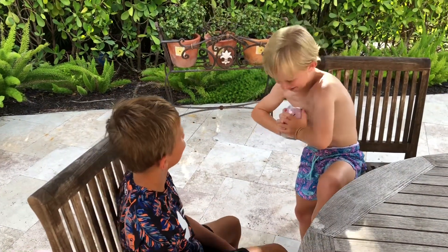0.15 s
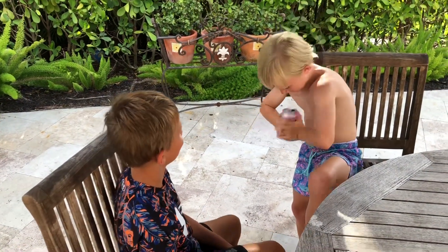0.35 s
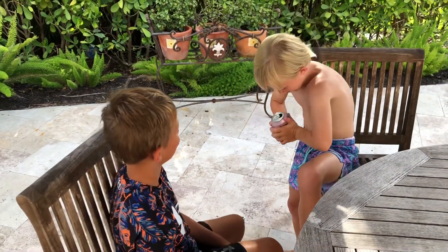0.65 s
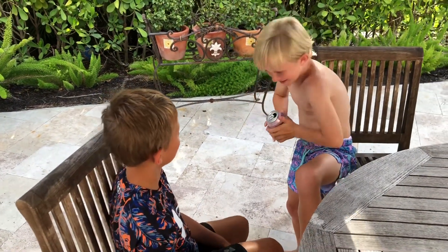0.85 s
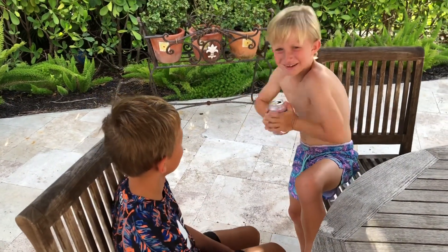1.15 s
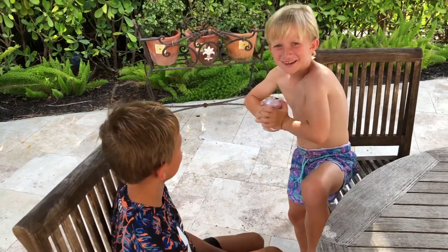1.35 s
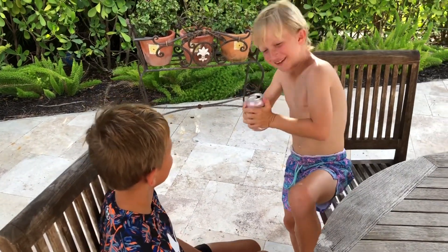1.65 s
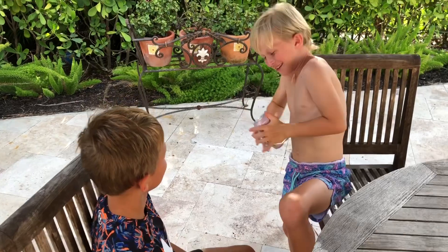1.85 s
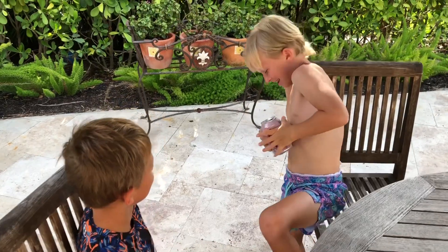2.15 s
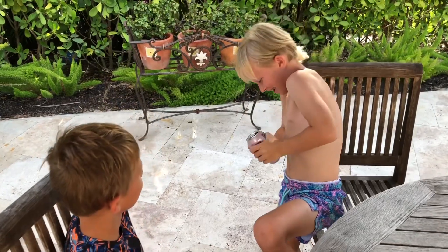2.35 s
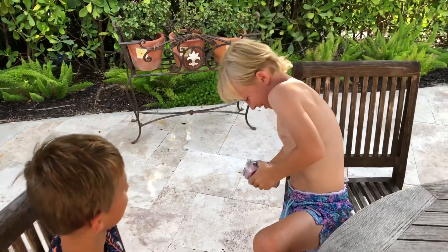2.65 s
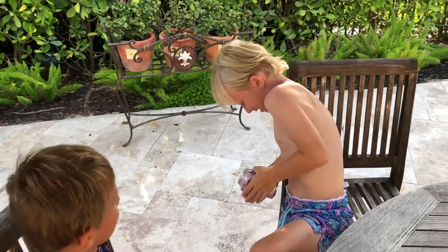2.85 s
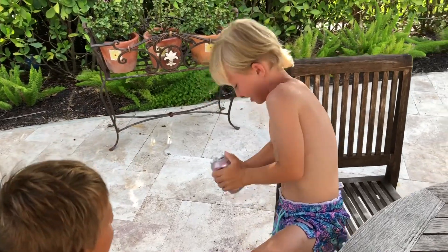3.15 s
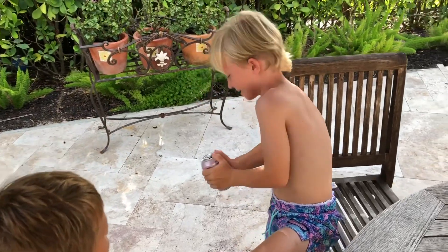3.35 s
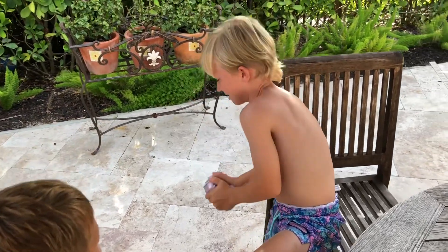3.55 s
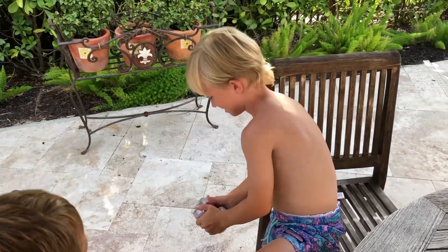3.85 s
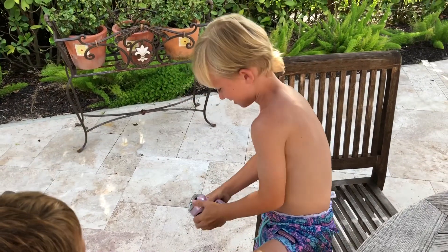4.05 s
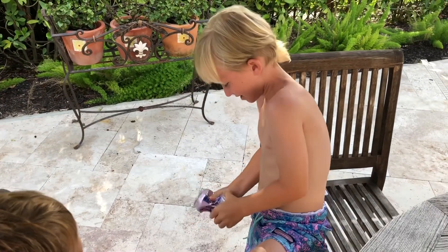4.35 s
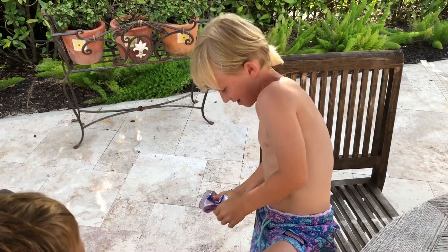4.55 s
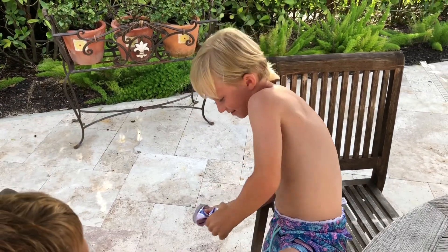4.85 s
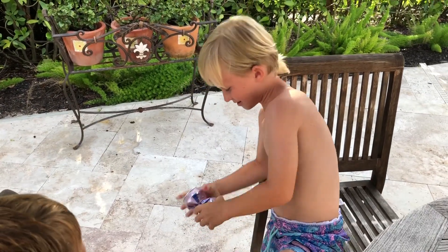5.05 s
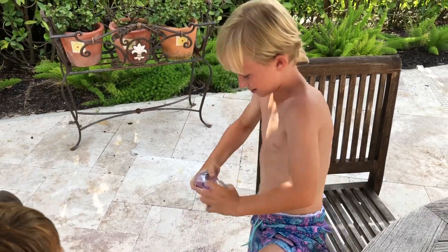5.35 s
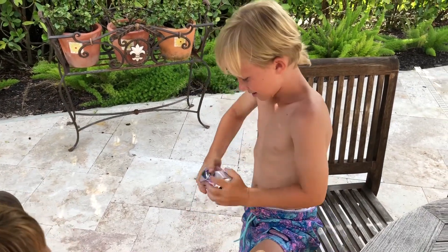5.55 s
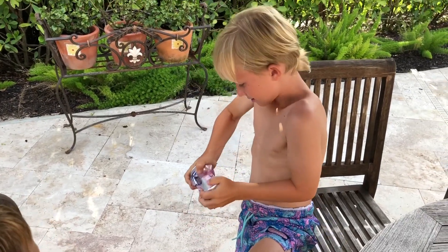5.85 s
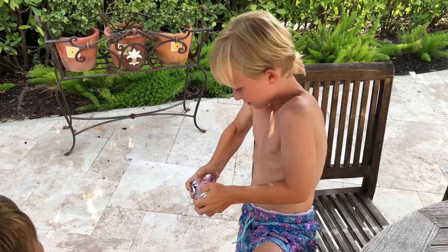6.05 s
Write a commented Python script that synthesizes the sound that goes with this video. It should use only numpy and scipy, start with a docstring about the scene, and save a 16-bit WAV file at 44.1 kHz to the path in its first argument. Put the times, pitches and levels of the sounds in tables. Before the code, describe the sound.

Hands squeeze an empty drink can on a patio, making bursts of tinny snaps and crackles that thin out toward the end.

```python
"""Garden patio: a thin aluminium can is crumpled by hand, a metre or two from a phone.
Each buckle snaps a wall facet through; a click and a brief crease chatter ring the facet and the air
in the can. Fingers rustle on the metal. Paving, house wall and hedge echo briefly. Behind: soft bumps
of the hand on the phone, a thin bird whistle, low outdoor rumble, leaf hiss and a distant motor's hum."""
import sys
import numpy as np
from scipy import signal
from scipy.fft import rfft, irfft
from scipy.io import wavfile
from scipy.ndimage import uniform_filter1d

SR = 44100
rng = np.random.default_rng(int(sys.argv[2]) if len(sys.argv) > 2 else 0)


def generate_wav(signal):
    """Clip the signal to [-1, 1] and save it as 16-bit WAV at the path in sys.argv[1]."""
    frames = np.transpose(np.atleast_2d(signal))
    scaled = np.clip(frames, -1, 1) * 32767
    pcm = np.round(scaled).astype(np.int16)
    wavfile.write(sys.argv[1], SR, pcm)


N = 273759

# Wall buckles. Each row: start in seconds, level in dB over 10 ms, facet pitch in Hz, crease pitch in Hz,
# then crease, crackle and can air in dB re the facet, and patio echo in dB re the direct sound.
BUCKLES = [(-0.03, -14.5, 5800, 8800, -3.5, -17, -10, -12.5),
           (0.066, -30.5, 3090, 6200, -2, -9.5, -5, -17.5),
           (0.082, -22.5, 3200, 9000, -9, -9.5, -14, -15.5),
           (0.1407, -15.5, 4060, 9400, -22, -10, -7.5, -12), (0.356, -41, 1040, 7900, -23, -16, -0.5, -4),
           (0.3663, -22, 8760, 11500, -4.5, -13.5, -10, -10.5), (0.406, -40.5, 1030, 3800, -5, -21, 7, -8),
           (0.4371, -41.5, 1230, 9000, -24, -20, -11, -11), (0.5426, -48, 1490, 4800, -20, -18, -5, -17),
           (0.8249, -21, 1520, 7900, 2.5, -8.5, -2, -14), (0.8681, -31, 5650, 7900, -3, -10.5, -3, -17),
           (0.914, -28.5, 1650, 6500, -15, -9.5, 1, -14), (1.0515, -45.5, 1010, 3180, -8, -1, 6, -11),
           (1.086, -27, 1150, 6600, -2, -4.5, -3, -15.5), (1.1831, -38, 1720, 2550, -23, -10, -23.5, -12),
           (1.3084, -39.5, 1120, 5700, 2.5, -16, 7, -13.5), (1.332, -37, 5730, 9100, -2.5, -8, -17.5, -12),
           (1.378, -27, 5600, 9500, 2, -14, -1.5, -17.5), (1.4247, -20, 7280, 9100, -1.5, -7.5, 3, -15.5),
           (1.5429, -24.5, 1360, 10200, -3, -5.5, 1, -12),
           (1.763, -12.5, 2470, 8150, -3, -5.5, -9.5, -14.5), (1.7947, -30.5, 1680, 4100, 11, 0, 0, -17),
           (1.9268, -37.5, 1210, 3100, -24.5, -22, -13, -8.5),
           (1.9388, -23, 1200, 7700, -15.5, -11, -13, -15.5),
           (2.0082, -28.5, 2100, 3780, -26, -21, -23.5, -18), (2.069, -24, 3130, 7700, -5, -9, -8, -17),
           (2.0892, -22.5, 3900, 10200, 2, -5.5, -3.5, -13), (2.1035, -18, 1197, 9300, -12.5, -14, 0, -13),
           (2.1199, -17, 1230, 7800, -6.5, -12.5, -8, -17), (2.1508, -25, 1150, 5800, -1, 5, 5, -7),
           (2.1616, -25, 1700, 10040, -15.5, -15.5, -23.5, -18),
           (2.1846, -21.5, 1090, 8680, -7, -12, -10.5, -15),
           (2.2421, -14.5, 2150, 8340, -8, -11.5, -6.5, -8),
           (2.2577, -22.5, 1090, 4800, -12, -19, -0.5, -6), (2.402, -31.5, 1960, 8460, 1, -8, -3.5, -16),
           (2.458, -34, 1220, 3830, -3, -5.5, -19, -19), (2.4613, -12, 1190, 8500, -17, -15, -11, -12),
           (2.4775, -15, 880, 9740, -9.5, -17, -4, -14.5), (2.5722, -35, 3880, 4900, 1.5, -9, 0, -13),
           (2.9499, -41.5, 1040, 7000, -20, -16.5, 15.5, -18),
           (3.2292, -22.5, 1590, 8300, -3.5, -8.5, -2, -18),
           (3.2669, -20, 7260, 10000, -3, -18.5, -30.5, -15.5),
           (3.2774, -27, 985, 8000, -7, -7, -1.5, -12.5), (3.3295, -19, 836, 1940, -2.5, -15, 3.5, -13),
           (3.3704, -29, 1120, 9000, -15, -18, 0, -13), (3.3789, -23.5, 1700, 8300, -22, -3, 6, -17),
           (3.4231, -34.5, 8100, 10500, -2, -12, -6, -18), (3.502, -29, 3950, 8600, -1.5, -7, 0.5, -15.5),
           (3.5812, -44, 3910, 5000, -23, -10, -11, -15),
           (3.6345, -38, 1000, 6940, -27, -14.5, 16.5, -10.5),
           (3.8521, -42.5, 1600, 3960, -4, -3.5, 15.5, -15),
           (4.2878, -38.5, 1560, 2010, -32, -38, -10, -24),
           (4.3073, -14.5, 3473, 8800, -10, -22, -26, -18.5),
           (4.416, -41.5, 950, 2760, -17, -9.5, 8.5, -21), (4.5834, -47, 1944, 3400, -15, -16, 2, -25),
           (5.59, -57, 4010, 13400, 3, 10, -5, -11), (5.8392, -40, 1136, 4150, -19, -14, 2.5, -17),
           (6.1128, -21.5, 3450, 6300, -10.5, -23.5, -24, -17)]
# Overtones of a large facet. Each row: multiple of the facet pitch, level in dB re the bending mode.
FACET_OVERTONES = [(1.38, -9), (1.85, -8.5)]
# Lasting rings of the whole can. Each row: centre in Hz, width in Hz, level in dB re the flat response.
HOLLOW_RINGS = [(469.5, 35, 3), (952, 72, -1.5), (1120, 45, -0.5), (1605, 120, 2.5), (2320, 41, -1),
                (3380, 23, -2)]
# Finger slides. Each row: start in seconds, length in seconds, rms level in dB, centre in Hz.
FINGER_SLIDES = [(4.011, 0.2, -59, 3180), (4.973, 0.09, -59.5, 6700)]
# House and hedge tail. Each row: low and high edge in Hz, level in dB re early echoes, T60 in seconds.
TAIL_BANDS = [(686, 2400, -11.5, .65), (2400, 6600, -11, 0.63), (6000, 9400, -21, .57)]
# Hand bumps on the phone. Each row: time in seconds, peak in dB.
HAND_BUMPS = [(1.776, -30.5), (2.038, -33.5), (2.79, -31.5), (4.828, -33), (5.239, -41), (5.409, -41),
              (5.959, -31), (6.128, -32.5)]
# Bird whistles. Each row: start in seconds, length in seconds, start and end pitch in Hz, rms level in dB.
BIRD_WHISTLES = [(0.575, 0.47, 6100, 6020, -66), (1.146, .22, 5960, 5920, -65),
                 (5.205, 0.21, 5790, 5770, -70.5), (5.314, 0.162, 6370, 6400, -70),
                 (6.056, 0.27, 5910, 6000, -52)]
# Rumble and hiss spectrum. Each row: frequency in Hz, relative density in dB.
GARDEN_SPECTRUM = [(15, -40.5), (30, -19.5), (50, -9), (80, -1.5), (120, -6.5), (220, -14.5), (480, -16.5),
                   (1050, -19), (1500, -27), (2400, -32.5), (4400, -37.5), (6400, -39.5), (16000, -52.5)]
# Background level rises as the phone's automatic gain recovers. Each row: time in seconds, gain in dB.
BACKGROUND_GAIN = [(0, -1.3), (1.8, 2.5), (6.2, 1.56)]

FFT_SIZE = 4096  # samples per buckle
BIN_HZ = np.maximum(np.fft.rfftfreq(FFT_SIZE, 1 / SR), 1)
CAN_AIR_HZ, CAN_AIR_WIDTH_HZ = 492, 300
SMALL_FACET_HZ = 2530
SNAP_SHARE, SNAP_SHARE_PER_OCTAVE = 0.45, 0.11  # at SMALL_FACET_HZ; small, stiff facets flip more cleanly
PING_DB, PING_DB_PER_CRACKLE_DB, PING_TOP_HZ, PING_WIDTH_HZ = -3.5, -0.4, 4800, 110


def crumple(lead_s=0.1, crackle_top_ratio=1.36, spill_db=6, settle_db=-29, settle_s=0.03):
    """Facets snap through and ring the can. Returns direct sound and patio feed, with a lead_s lead-in."""
    direct, thrown = np.zeros((2, N + int(lead_s * SR)))
    hollow = hollow_can()
    for start_s, db, facet_hz, crease_hz, crease_db, crackle_db, air_db, echo_db in BUCKLES:
        at_s = start_s + lead_s
        gain = np.sqrt(SR / 100) * undb(db)
        share = SNAP_SHARE + SNAP_SHARE_PER_OCTAVE * np.log2(facet_hz / SMALL_FACET_HZ)
        modes = facet_modes(facet_hz) + [(crease_hz, crease_db)]
        top_hz = crackle_top_ratio * crease_hz
        wall = can_wall(crackle_db, top_hz, air_db, modes) * hollow
        crack = irfft(snap_through(share) * wall * near_bounces())
        add(direct, at_s, unit(crack) * gain)
        # Over all directions, the many small modes gain on the single facet.
        all_round = can_wall(crackle_db + spill_db, top_hz, air_db, modes) * hollow
        add(thrown, at_s, unit(irfft(all_round)) * gain * undb(echo_db))
        # Neighbouring creases settle: dull ticks, the later the fainter.
        for _ in range(3):
            tick = unit(band(irfft(snap_through(share) * wall), 500, 4900, order=1))
            lateness = rng.gamma(2, 0.5)
            tick_gain = undb(settle_db + 3 * rng.standard_normal()) * np.exp(1 - lateness)
            add(direct, at_s + settle_s * lateness, tick * gain * tick_gain)
    return direct, thrown


def snap_through(share, snap_s=0.0002, chatter_s=0.0028, grain_db=4):
    """Force spectrum of a buckle: a snap with `share` of the energy, then creases give way one by one."""
    t = np.arange(FFT_SIZE) / SR
    snap, chatter = rng.standard_normal((2, FFT_SIZE))
    share = np.clip(share, 0, 1)
    snap = unit(snap * np.exp(-t / snap_s))
    chatter *= undb(grain_db * walk(4000, FFT_SIZE))
    chatter = unit(chatter * np.exp(-t / chatter_s) * (1 - np.exp(-t / snap_s)))
    force = rfft(np.sqrt(share) * snap + np.sqrt(1 - share) * chatter)
    smooth_power = uniform_filter1d(np.abs(force) ** 2, size=45)
    return force * minimum_phase(smooth_power ** -0.5)  # white overall, fine ripple kept


def facet_modes(hz):
    """Bending mode and overtones as (Hz, dB); small facets lose the overtones."""
    fade_db = -20 * np.log10(1 + (hz / SMALL_FACET_HZ) ** 4)
    return [(hz, 0)] + [(hz * ratio, db + fade_db) for ratio, db in FACET_OVERTONES]


def can_wall(crackle_db, top_hz, air_db, modes, hand_damping=16, radiate_hz=1100):
    """Dented can's response: countless small modes, enclosed air, hand-damped facet modes and a ping."""
    power = undb(crackle_db) ** 2 / (1 + (BIN_HZ / top_hz) ** 8) / (1 + (radiate_hz / BIN_HZ) ** 4)
    power += (undb(air_db) * resonance(CAN_AIR_HZ, CAN_AIR_WIDTH_HZ)) ** 2
    for hz, db in modes:
        power += (undb(db) * resonance(hz, hand_damping * np.sqrt(hz))) ** 2
    bending_hz = modes[0][0]
    power += facet_ping(bending_hz, crackle_db) ** 2
    return minimum_phase(np.sqrt(power))


def facet_ping(hz, crackle_db):
    """Gain curve of the bending mode's longer, tinny ring: strong on clean flips, lost on tiny facets."""
    gain = undb(PING_DB + PING_DB_PER_CRACKLE_DB * crackle_db) / (1 + (hz / PING_TOP_HZ) ** 6)
    return gain * resonance(hz, PING_WIDTH_HZ)


def hollow_can():
    """Response of the whole can's narrow rings, woken by every buckle."""
    ring_power = sum(undb(db) ** 2 * resonance(hz, width_hz) for hz, width_hz, db in HOLLOW_RINGS)
    return minimum_phase(np.sqrt(1 + ring_power))


def near_bounces(chest_s=0.0018, chest_db=-11, table_s=0.006, table_db=-16):
    """Response of the direct path plus chest and table bounces; lags vary as the hands move."""
    lags_s = np.array([chest_s, table_s]) * rng.uniform(0.5, 1.5, 2)
    delays = np.exp(-2j * np.pi * np.outer(lags_s, BIN_HZ))
    return 1 + undb([chest_db, table_db]) @ delays


def patio(x, first_s=0.0088, early_t60_s=0.18, grain_db=4, slap_db=-10, slap_s=0.014):
    """Grainy early echoes off paving and furniture, one wall slap, a faint tail off house and hedge."""
    t = np.arange(SR * 3 // 4) / SR
    early, grain, tail = rng.standard_normal((3, len(t)))
    echoes = unit(early * undb(grain_db * grain) * decay(t, early_t60_s))
    for lo_hz, hi_hz, db, t60_s in TAIL_BANDS:
        echoes += undb(db) * unit(band(tail, lo_hz, hi_hz) * decay(t, t60_s))
    response = np.r_[np.zeros(int(first_s * SR)), echoes]
    response[int(slap_s * SR)] += undb(slap_db)
    return signal.fftconvolve(x, response)[:len(x)]


def fingers(slips_per_s=2500, scatter_db=4, edge_ratio=1.42):
    """Skin catches and slips on the creases as the grip shifts: a faint, grainy rustle."""
    out = np.zeros(N)
    for start_s, length_s, db, hz in FINGER_SLIDES:
        n = int(length_s * SR)
        slips = (rng.random(n) < slips_per_s / SR) * undb(scatter_db * rng.standard_normal(n))
        rustle = band(slips, hz / edge_ratio, hz * edge_ratio, order=1)
        add(out, start_s, at_rms(rustle * signal.windows.tukey(n, 0.8), db))
    return out


def hand_bumps(rise_s=0.016, lo_hz=45, hi_hz=170):
    """Dull bumps of the hand that holds the phone."""
    out, t = np.zeros(N), np.arange(SR // 5) / SR
    for time_s, peak_db in HAND_BUMPS:
        bump = band(rng.standard_normal(len(t)) * t * np.exp(-t / rise_s), lo_hz, hi_hz)
        add(out, time_s - rise_s, bump / np.abs(bump).max() * undb(peak_db))
    return out


def bird(waver_hz=55, flutter_db=2, hedge_t60_s=0.12, hedge_db=-4):
    """Thin, distant whistles of nearly steady pitch, blurred by the hedge."""
    out, t = np.zeros(N), np.arange(SR // 10) / SR
    for start_s, length_s, start_hz, end_hz, db in BIRD_WHISTLES:
        n = int(length_s * SR)
        hz = np.linspace(start_hz, end_hz, n) + waver_hz * walk(300, n)
        envelope = signal.windows.tukey(n, 0.8) * undb(flutter_db * walk(54, n))
        whistle = np.sin(2 * np.pi * np.cumsum(hz) / SR) * envelope
        leaves = unit(rng.standard_normal(len(t)) * decay(t, hedge_t60_s))
        path = (t == 0) + undb(hedge_db) * leaves
        add(out, start_s, at_rms(signal.fftconvolve(whistle, path), db))
    return out


def garden(base_db=-48, flicker_db=3.5, smooth_hz=1200):
    """Distant rumble wavering in half-octave bands, smooth leaf hiss above."""
    points_hz, points_db = np.transpose(GARDEN_SPECTRUM)
    hz, air = np.fft.rfftfreq(N, 1 / SR), np.zeros(N)
    shape_db = np.interp(np.log(hz + 1), np.log(points_hz), points_db)
    spectrum = rfft(rng.standard_normal(N)) * undb(shape_db)
    for lo_hz in 20 * 2 ** (np.arange(20) / 2):
        in_band = (hz >= lo_hz) & (hz < lo_hz * np.sqrt(2))
        waver = undb(flicker_db / (1 + lo_hz / smooth_hz) * walk(7))
        air += irfft(spectrum * in_band, N) * waver
    return at_rms(air, base_db)


def motor(t, hz=119.5, base_db=-58, waver_db=0.5):
    """Distant motor: one low tone, slightly wavering in level."""
    return at_rms(np.sin(2 * np.pi * hz * t) * undb(waver_db * walk(1.4)), base_db)


def undb(db):
    """Decibels to gain."""
    return 10 ** (np.asarray(db) / 20)


def unit(x):
    """Scale to unit energy."""
    return x / np.sqrt(np.sum(x ** 2))


def at_rms(x, db):
    """Scale to an rms level."""
    return unit(x) * np.sqrt(len(x)) * undb(db)


def decay(t, t60_s):
    """Envelope falling 60 dB in t60_s."""
    return np.exp(-np.log(1000) * t / t60_s)


def add(track, start_s, sound):
    """Mix a sound into the track."""
    start = int(np.clip(start_s * SR, 0, len(track) - 1))
    track[start:start + len(sound)] += sound[:len(track) - start]


def band(x, lo_hz, hi_hz, order=2):
    """Butterworth band-pass."""
    return signal.sosfilt(signal.butter(order, [lo_hz, hi_hz], "band", fs=SR, output="sos"), x)


def walk(rate_hz, size=N):
    """Random steps, smoothed twice; spread near 1."""
    hold = int(SR / rate_hz)
    steps = np.repeat(rng.standard_normal(size // hold + 1), hold)
    return np.sqrt(2) * uniform_filter1d(uniform_filter1d(steps, hold), hold)[:size]


def resonance(hz, width_hz):
    """Steep-skirted gain curve, 1 at its centre."""
    return 1 / (1 + ((BIN_HZ ** 2 - hz ** 2) / (BIN_HZ * width_hz)) ** 2)


def minimum_phase(gain):
    """Causal response of a gain curve: rings only after the blow."""
    cepstrum = irfft(np.log(gain + 1e-5 * gain.max()))
    cepstrum[1:FFT_SIZE // 2] *= 2
    cepstrum[FFT_SIZE // 2 + 1:] = 0
    return np.exp(rfft(cepstrum))


def scene():
    """Can and echo in front of the garden, mono; the crushing is under way at the start."""
    t = np.arange(N) / SR
    direct, thrown = crumple()
    can = (direct + patio(thrown))[-N:]
    background_gain = undb(np.interp(t, *np.transpose(BACKGROUND_GAIN)))
    return (can + fingers() + hand_bumps() + bird() + (garden() + motor(t)) * background_gain)[None]


def record(dry):
    """The phone rounds the tallest peaks and cuts the top."""
    ceiling, top_hz = 1.3, 16000
    low_pass = signal.ellip(10, 0.2, 70, top_hz, fs=SR, output="sos")
    return signal.sosfilt(low_pass, ceiling * np.tanh(dry / ceiling))


dry = scene()
out = record(dry)
generate_wav(out)
```